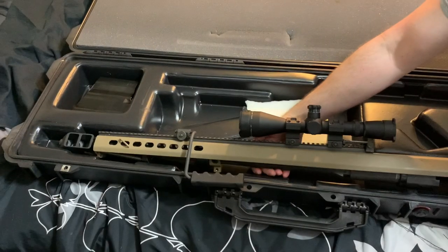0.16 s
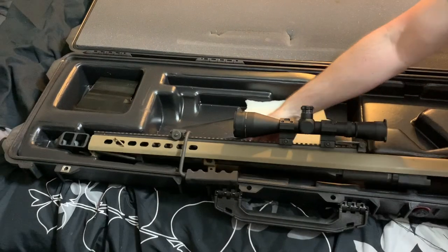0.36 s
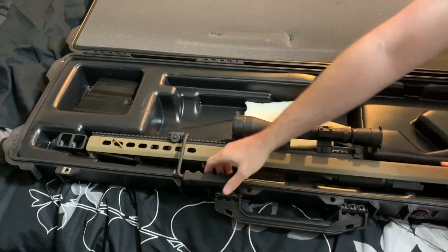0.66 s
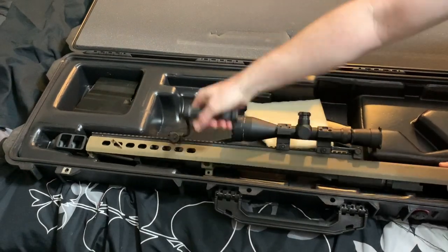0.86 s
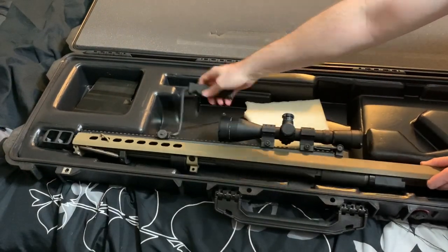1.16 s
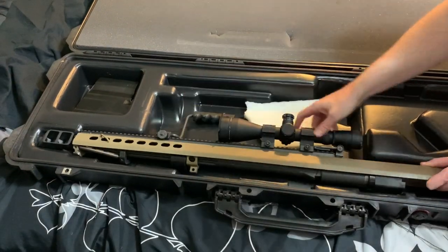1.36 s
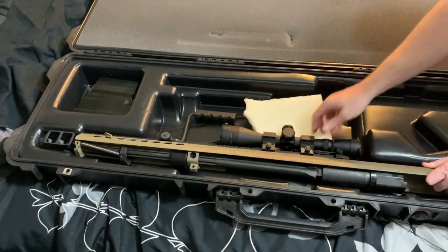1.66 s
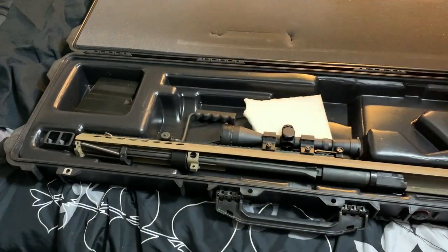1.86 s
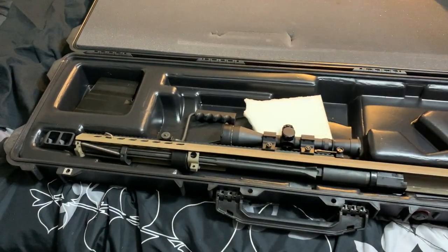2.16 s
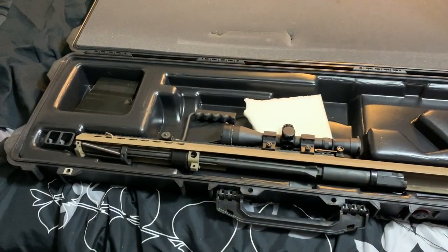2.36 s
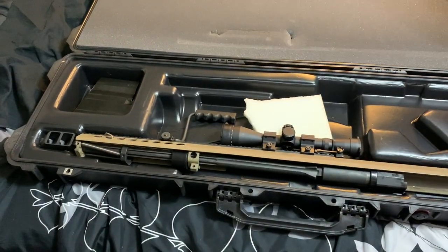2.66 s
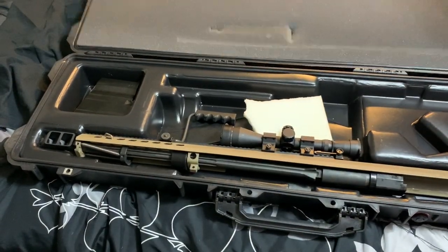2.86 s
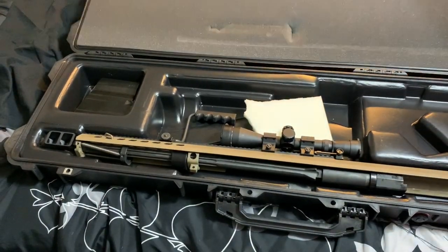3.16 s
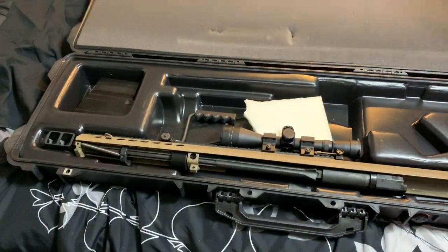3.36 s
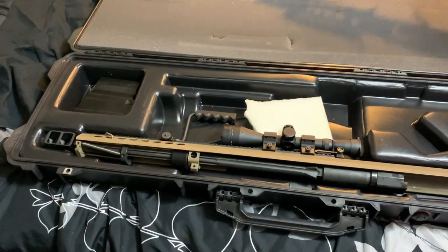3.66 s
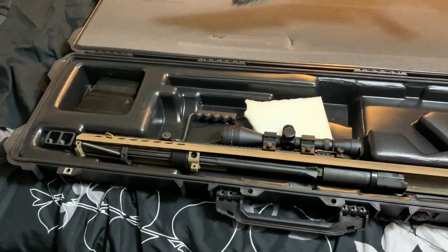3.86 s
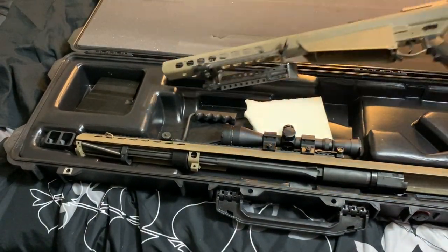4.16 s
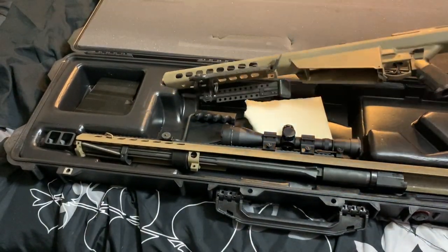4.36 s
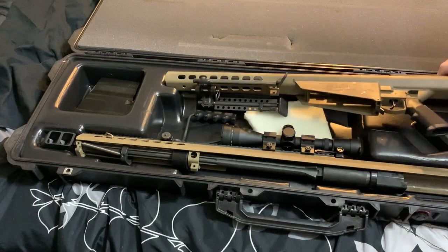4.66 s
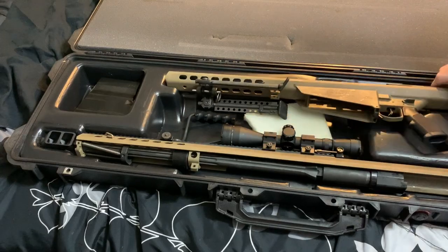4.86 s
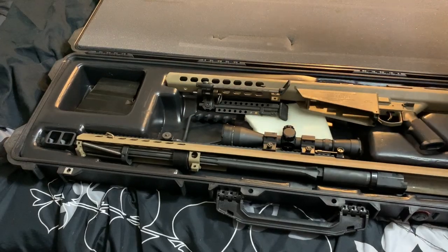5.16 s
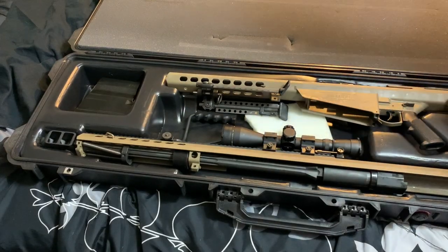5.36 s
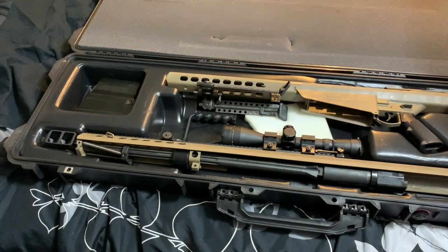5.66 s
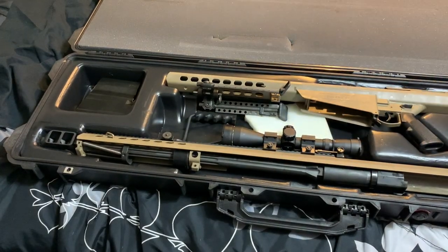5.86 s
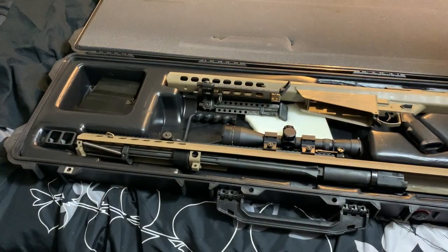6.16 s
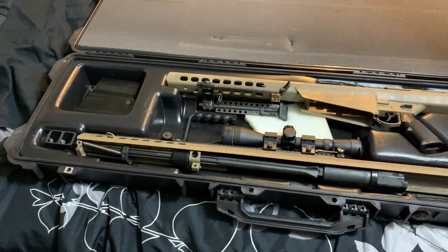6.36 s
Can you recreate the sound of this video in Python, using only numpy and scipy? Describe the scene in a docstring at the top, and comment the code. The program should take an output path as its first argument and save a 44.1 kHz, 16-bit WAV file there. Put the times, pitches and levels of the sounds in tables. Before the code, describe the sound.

Metal rifle parts are laid into a hard plastic case on a bed, heard from close by. Dull, hollow knocks with a steely edge start at once, with another near 0.4 seconds. From 1 to 1.5 seconds comes a loud cluster of knocks and clacks, strongest around 1.2. Light bumps follow between 1.9 and 2.7 seconds. A sharp steel clink sounds at 3 seconds, amid soft rubbing on plastic and foam, and loose fittings tick faintly until about 4.2. A duller group of knocks arrives around 4.3 seconds, then a little scraping and tapping. One loud, hard knock lands at 5.5 seconds, followed by a lighter metallic clack at 6 and small settling taps until about 6.4. The shell drones faintly as it is handled, and a low, quiet bedroom hum lies underneath throughout.

```python
"""Dull knocks with a hard clack and a steely edge: rifle parts are laid into a plastic case on a bed.
Each contact rattles the hollow shell, which also drones as it is handled, over a quiet bedroom hum.
Hands and parts rub on plastic and foam, and loose steel fittings tick against each other.
A microphone with two openings (ports) listens from close by."""
import sys
import numpy as np
from scipy import signal
from scipy.fft import rfft, irfft, next_fast_len
from scipy.io import wavfile
from scipy.ndimage import uniform_filter1d, map_coordinates

SR = 44100
rng = np.random.default_rng(int(sys.argv[2]) if len(sys.argv) > 2 else 0)


def generate_wav(sig):
    """Save sig (samples, or channels by samples) to the path in sys.argv[1] as 16-bit PCM at SR."""
    pcm = np.round(np.clip(np.atleast_2d(sig).T, -1, 1) * 32767).astype(np.int16)
    wavfile.write(sys.argv[1], SR, pcm)


N = 287267
SIZE = 8192  # samples in one knock or tick

# The pitches at which the hollow shell rings (its modes): f/Hz, width/Hz, level/dB
SHELL_MODES = [(93, 19, -6.5), (198.5, 28, -8), (314, 70, 3.5), (371.5, 69, 4), (454.1, 69, 2.5),
               (567.7, 54, 1), (604.3, 70, -2.5), (800, 97, -12.5), (786, 160, -2.5), (969.6, 90, -3.5),
               (1154, 150, -9.5)]
# The modes of the case's stiff ribs: f/Hz, width/Hz, level/dB
RIB_MODES = [(1395, 40, -3), (1786, 270, 5), (1954, 130, 0), (2150, 180, 2), (2350, 42, 3),
             (2830, 300, 0.5), (3130, 180, -6.5)]
# The modes of the steel parts: f/Hz, width/Hz, level/dB
STEEL_MODES = [(3500, 70, 1.5), (4500, 1300, 1.5), (4942, 620, -3.5), (5570, 1800, -1), (5850, 160, -4),
               (6560, 610, -4.5), (7160, 550, -7.5), (8030, 1100, -0.5), (8710, 57, -16), (9800, 150, -13),
               (11190, 80, -15.5), (13600, 250, -9.5), (15200, 2400, -9.5)]


def amp(db):
    """Turn decibels into a gain."""
    return 10 ** (np.asarray(db) / 20)


def unit(x):
    """Scale x to an average (rms) level of 1."""
    return x / np.sqrt(np.mean(x ** 2) + 1e-20)


def along(points, hz):
    """Join (f/Hz, value) points along a log pitch axis."""
    f, v = np.transpose(points)
    return np.interp(np.log(hz + 1), np.log(f + 1), v)


def wobble(rate):
    """A smooth curve through `rate` random values a second."""
    return map_coordinates(rng.standard_normal(int(N * rate / SR) + 4), [np.arange(N) * rate / SR])


def filtered(x, response):
    """Change each frequency in x by response(hz)."""
    n = x.shape[-1]
    padded = next_fast_len(n + 4096)
    return irfft(rfft(x, padded) * response(np.fft.rfftfreq(padded, 1 / SR)), padded)[..., :n]


def add(out, s, sound):
    """Mix a sound in at s seconds."""
    start = max(round(s * SR), 0)
    out[:, start:start + sound.shape[1]] += sound


def modes(table, f):
    """How each mode answers frequencies f, one a row; neighbours swing opposite ways."""
    centre, width, db = np.transpose(table)[:, :, None]
    sign = (-1.) ** np.arange(len(centre))[:, None]
    return amp(db) * sign * 1j * f * width / (centre * centre - f * f + 1j * f * width)


def soft(f, edge_hz):
    """A contact that gives way passes little force above edge_hz."""
    return 1 / (1 + 1j * f / edge_hz) ** 2


def hump(f, hz, breadth):
    """A broad peak around hz, breadth * hz wide."""
    return modes([(hz, breadth * hz, 0)], f)[0]


def strengths(table, hz, octave_db, scatter_db):
    """How hard each mode is shaken: less the further it is from hz, and partly by chance."""
    centre = np.transpose(table)[0]
    return amp(-octave_db * np.abs(np.log2(centre / hz)) + scatter_db * rng.standard_normal(len(centre)))


def blow(decay_s, lead_s, snap):
    """The force of a contact builds for lead_s, snaps, then chatters away."""
    t = np.arange(SIZE * 7 // 8) / SR - lead_s
    chatter = np.where(t < 0, amp(30 * t / lead_s), amp(-60 * t / decay_s - 20 * (t / 0.12) ** 3))
    return chatter + snap * np.exp(-(t / 0.00061) ** 2)


def shake(force, response, crest):
    """Two noises follow the force and shake a body; the loudest moment has rms 1 / crest."""
    noise = rng.standard_normal((2, len(force))) * force
    body = irfft(rfft(noise, SIZE * (len(force) // SIZE + 1)) * response)
    power = uniform_filter1d(np.mean(body ** 2, axis=0), size=128)
    return body / (crest * np.sqrt(np.max(power)))


def knocks():
    """A part strikes a panel and the case bounces; harder contacts bring out the rim and ribs."""
    # Knocks on the shell: t/s, level/dB, panel f/Hz, clack/dB, steel/dB (both against the panel), decay/s
    contacts = [(0.001, -16.5, 530, -6.5, -4.5, 0.055), (0.029, -29, 510, -1.5, -1, 0.28),
                (0.047, -20, 520, -0.5, -11.5, .14), (0.056, -10, 604, -6.5, -10.5, 0.099),
                (0.121, -13.5, 636, -9.5, -37, 0.049), (0.152, -21.5, 580, -7, -32, 0.1),
                (0.187, -31.5, 470, -29, -31, 0.035), (0.283, -28, 460, -6.5, -15.5, 0.065),
                (0.374, -39, 641, -5.5, -33, 0.073), (0.444, -14, 517, -13, -15, 0.068),
                (0.461, -21, 413, -36, -33, 0.037), (0.551, -37.5, 417, -32, -18, .21),
                (0.614, -28.5, 346, -9, -14, 0.083), (0.638, -30, 450, -15, -33, 0.14),
                (0.668, -37.5, 364, -9, -12.5, .11), (0.729, -41.5, 616, -8, -11, 0.099),
                (0.791, -36.5, 443, -28, -27, .043), (0.876, -26.5, 800, -13.5, -23.5, .2),
                (0.952, -23.5, 556, -12, -7, 0.26), (1.006, -9, 660, -11, -18, 0.072),
                (1.121, -29.5, 444, -21, -24, 0.079), (1.138, -17.5, 460, -14.5, -15.5, 0.07),
                (1.188, -46.5, 291, 2, 7.5, 0.087), (1.248, -5, 645, -9, -12.5, 0.078),
                (1.309, -11, 607, -12.5, -20, 0.081), (1.336, -14.5, 550, -22, -21, 0.096),
                (1.422, -20, 495, -9.5, -13.5, .1), (1.447, -14.5, 628, -8.5, -4.5, 0.083),
                (1.57, -27, 344, -23, -22, 0.099), (1.625, -48, 436, -17.5, -17.5, 0.23),
                (1.884, -38, 447, -19, -40, 0.077), (1.912, -35.5, 471, -20.5, -54.5, .09),
                (1.985, -55.5, 583, -2.5, -14, 0.051), (2.09, -47.5, 357, -10.5, -14, 0.13),
                (2.145, -48.5, 480, -16, -21, 0.22), (2.197, -43.5, 387, -24.5, -23, 0.064),
                (2.384, -34.5, 413, -29, -30, .15), (2.395, -39, 420, -15.5, -12.5, .08),
                (2.45, -40.5, 277, -31, -12.5, 0.2), (2.478, -33.5, 340, -43, -52, 0.036),
                (2.501, -28, 456, -12, -40, 0.093), (2.685, -39.5, 455, -27.5, -20, 0.1),
                (2.737, -33, 401, -12, -45, .11), (3.029, -19.5, 626, -4.5, -1, 0.091),
                (3.059, -35, 367, -6.5, -21, 0.17), (3.179, -35, 436, -6.5, -2.5, 0.067),
                (3.423, -39.5, 392, -13, -35, 0.14), (3.458, -33, 386, -7, -26, 0.064),
                (3.48, -28.5, 296, -10, -23, .073), (3.662, -53.5, 900, -5, -21, .06),
                (4.246, -17, 505, -9.5, -44, 0.12), (4.268, -19.5, 443, -17.5, -14.5, .12),
                (4.35, -25, 800, -14, -33, 0.1), (4.853, -47, 900, -5.5, -11, 0.068),
                (4.935, -37.5, 380, -26.5, -31.5, 0.042), (4.982, -50.5, 456, -35, -27, .06),
                (5.097, -44.5, 430, -14.5, -10, 0.11), (5.129, -40.5, 422, -12.5, -20, 0.15),
                (5.398, -27.5, 445, -25.5, -23, 0.13), (5.421, -29.5, 1000, -8, -9.5, 0.1),
                (5.499, -4, 800, -15.5, -9, 0.076), (5.632, -47, 446, -14.5, -12.5, 0.1),
                (5.672, -34.5, 309, -43, -35.5, 0.17), (5.71, -48, 328, -17, -15, 0.2),
                (5.907, -41, 304, -9.5, -18.5, 0.096), (5.936, -41, 458, -31.5, -38.5, 0.021),
                (6.024, -26.5, 441, -4.5, -0.5, .075), (6.031, -25.5, 467, -3.5, -1.5, .09),
                (6.108, -41, 269, -31, -30, .12), (6.145, -39.5, 950, -11.5, -19, 0.094),
                (6.188, -37, 950, -15, -36, 0.1), (6.279, -63.5, 447, -10, -4.5, 0.13),
                (6.34, -29, 487, -26, -19, 0.095), (6.406, -38.5, 460, -10, -14.5, 0.11)]
    out = np.zeros((2, N + SR))
    f = np.fft.rfftfreq(SIZE, 1 / SR)
    shell = modes(SHELL_MODES, f) * soft(f, edge_hz=2700)
    ribs = modes(RIB_MODES, f) * soft(f, edge_hz=6000)
    steel = modes(STEEL_MODES, f)
    thud = shell[0] + 1.2 * shell[1]  # the case bouncing on the bed
    plastic = 1.19 * hump(f, 1600, breadth=1.0) * soft(f, edge_hz=5270)  # many short-lived modes
    for s, db, hz, clack_db, steel_db, decay in contacts:
        # low or light knocks have a larger share of thud
        thud_db = -11.5 - 7 * np.log2(min(hz, 600) / 450) - .2 * (db + 30.5)
        rim_db = 3.5 + 0.9 * clack_db
        steel_hz = 4360 * 2 ** np.clip((steel_db - clack_db) / 23, -.3, 1.2)  # more steel sounds higher
        firm = np.clip((db + 55) / 30, .1, 1)  # light contacts barely snap
        lead = .09 * decay  # soft contacts build slowly and last
        strength = strengths(SHELL_MODES, hz, octave_db=14.5, scatter_db=5.5)
        panel = 0.57 * strength[2:7] @ shell[2:7] + hump(f, hz, breadth=0.25) * soft(f, edge_hz=1500)
        rim = strength[7:] @ shell[7:]
        clack = strengths(RIB_MODES, 2700, octave_db=3.5, scatter_db=5) @ ribs + plastic
        metal = strengths(STEEL_MODES, steel_hz, octave_db=10.5, scatter_db=9.5) @ steel
        metal += hump(f, steel_hz, breadth=1.0) * soft(f, edge_hz=5 * steel_hz)
        sound = shake(blow(decay, lead, snap=1.6 * firm), panel, crest=2.06)
        sound += amp(thud_db) * shake(blow(2.1 * decay, 1.8 * lead, snap=2.0), thud, crest=2.0)
        sound += amp(rim_db) * shake(blow(1.5 * decay, lead, snap=5 * firm), rim, crest=1.79)
        sound += amp(clack_db) * shake(blow(1.23 * decay, lead, snap=1.4 * firm), clack, crest=1.605)
        sound += amp(steel_db) * shake(blow(1.245 * decay, lead, snap=firm), metal, crest=2.51)
        add(out, s + .002 - lead, amp(db) * sound)
    return out[:, :N]


def shell_drone():
    """Sliding hands and shifting weight keep the shell droning at its own pitches."""
    # How loud the handled shell drones: t/s, level/dB
    loudness = [(0.0, -30), (0.05, -44), (0.2, -51), (0.45, -49), (0.94, -64.5), (1.43, -56), (1.651, -65),
                (1.96, -68.5), (3.0, -59), (3.87, -71.5), (5.43, -66.5), (5.56, -59), (5.65, -68),
                (6.5, -65)]
    s, db = np.transpose(loudness)
    friction = amp(4 * wobble(30)) * rng.standard_normal((2, N))
    drone = filtered(friction, lambda hz: modes(SHELL_MODES[1:], hz).sum(axis=0) * soft(hz, edge_hz=1800))
    return amp(np.interp(np.arange(N) / SR, s, db)) * unit(drone)


def room_hum():
    """The house hums, low and unsteady."""
    # The tone of the room's noise: f/Hz, relative level/dB
    hum_tone = [(15, -54), (25, -21.5), (108, 3.5), (309, -8), (354, -5.5), (575, -6), (1290, -39),
                (1940, -21.5), (3250, -33), (4140, -33.5), (6560, -36), (12900, -43), (16000, -39.5)]
    db = -63.5 + 0.99 * wobble(13) + 1.5 * wobble(12)
    hum = filtered(rng.standard_normal((2, N)), lambda hz: amp(along(hum_tone, hz)))
    return amp(db) * unit(hum)


def rubs():
    """Each stroke swells and fades unevenly; grit catches and faintly rings the ribs and steel."""
    # Strokes on plastic and foam: t/s, length/s, level/dB, brightest f/Hz
    strokes = [(0.032, 0.054, -35.5, 4870), (0.199, 0.17, -62, 3050), (0.299, 0.25, -57.5, 3150),
               (0.871, 0.087, -46.5, 2630), (1.397, 0.078, -48, 4840), (1.522, 0.057, -59.5, 2700),
               (2.067, 0.21, -68, 8900), (2.275, 0.41, -65.5, 8930), (2.836, 0.76, -55.5, 7500),
               (3.517, 0.61, -67, 6320), (4.328, 0.051, -45.5, 1200), (4.537, 0.17, -58, 3820),
               (4.774, 0.043, -63.5, 6960), (4.804, 0.041, -54.5, 3000), (4.939, 0.054, -73.5, 10320),
               (5.075, 0.069, -64.5, 7000), (5.696, 0.04, -66.5, 7000), (5.764, 0.16, -70, 3534),
               (5.887, 0.063, -60.5, 6860), (6.367, 0.16, -65, 5000)]
    out = np.zeros((2, N + SR))
    parts = RIB_MODES + STEEL_MODES
    for s, length, db, hz in strokes:
        t = np.arange(round(length * SR)) / SR
        drag_db = 2.5 * np.interp(t * 35, np.arange(40), rng.standard_normal(40))
        grit_db = 2.3 * np.interp(t * 350, np.arange(400), rng.exponential(size=400))
        force = np.sin(np.pi * t / length) ** 0.88 * amp(drag_db + grit_db)
        f = np.fft.rfftfreq(SIZE * (len(t) // SIZE + 1), 1 / SR)
        ring = .5 * strengths(parts, hz, octave_db=2, scatter_db=7) @ modes(parts, f)
        rasp = 1.2 * hump(f, hz, breadth=1.8) * soft(f, edge_hz=3 * hz)
        add(out, s, amp(db) * shake(force, ring + rasp, crest=1))
    return out[:, :N]


def ticks():
    """Small steel fittings tap each other and ring briefly."""
    # Taps of loose fittings: t/s, level/dB, brightest f/Hz
    taps = [(0.5216, -48.5, 14600), (0.647, -42.5, 4440), (0.7467, -40.5, 3130), (2.3107, -52, 3940),
            (2.7605, -41.5, 7650), (2.885, -52, 7010), (2.9436, -47.5, 7930), (3.029, -18.5, 11400),
            (3.2884, -48.5, 7900), (3.3564, -49.5, 7200), (3.458, -40, 12660), (3.5563, -51, 7030),
            (3.5775, -48, 6400), (3.6464, -54.5, 6550), (3.6913, -52.5, 6760), (3.7478, -46.5, 6820),
            (3.8037, -42, 14200), (3.8313, -49, 3720), (3.92, -47.5, 7240), (4.0076, -50.5, 6480),
            (4.0968, -47.5, 6770), (4.1835, -50.5, 6130), (4.4518, -47.5, 6500), (4.808, -46, 15400),
            (5.131, -42, 14370), (5.466, -40, 4700), (5.8624, -55.5, 3150), (6.032, -22, 9800),
            (6.146, -49, 12600)]
    out = np.zeros((2, N + SR))
    f = np.fft.rfftfreq(SIZE, 1 / SR)
    steel = modes(STEEL_MODES, f)
    force = blow(decay_s=0.12, lead_s=0.0043, snap=0.87)
    for s, db, hz in taps:
        ring = strengths(STEEL_MODES, hz, octave_db=22, scatter_db=-2) @ steel
        click = 0.66 * hump(f, hz, breadth=0.47) + 0.13 * hump(f, 2500, breadth=1.3)
        add(out, s - .003, amp(db) * shake(force, ring + click, crest=3.16))
    return out[:, :N]


def ports(pair, scattered):
    """The two ports hear one wave out of step, more so in the treble, plus a scattered share."""
    # The difference between the ports against their sum: f/Hz, level/dB
    stereo_width = [(60, -10.5), (110, -14), (200, -15), (380, -16), (700, -9), (1290, -2), (2380, -0.5),
                    (4400, 0.5), (8120, -1.5), (15000, 0.5)]
    mid, other = pair
    shifted = signal.hilbert(mid, next_fast_len(N))[:N].imag  # every frequency a quarter cycle late
    side = np.sqrt(1 - scattered) * shifted + np.sqrt(scattered) * other
    side = filtered(side, lambda hz: amp(along(stereo_width, hz)))
    return np.array([mid + side, mid - side])


def scene():
    """Contacts reach the microphone more directly than the steady sounds do."""
    contacts = ports(knocks() + ticks() + rubs(), scattered=0.51)
    steady = ports(shell_drone() + room_hum(), scattered=.8)
    return contacts + steady


def record(dry):
    """Take away the deep bass and the very highest treble."""
    bass_hz, top_hz = 55, 16000
    return filtered(dry, lambda hz: np.clip((top_hz - hz) / 500, 0, 1)
                    * (1j * hz / (1j * hz + bass_hz)) ** 3)


dry = scene()
out = record(dry)
generate_wav(out)
```